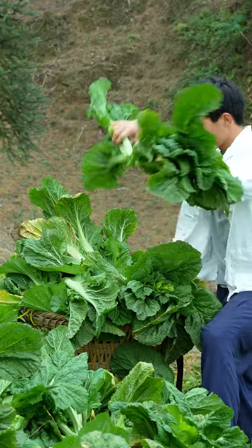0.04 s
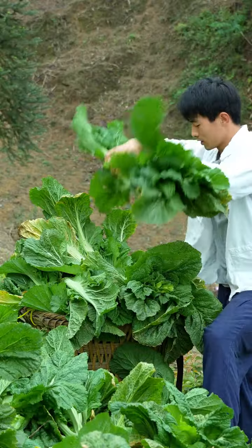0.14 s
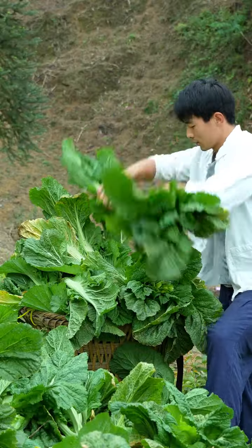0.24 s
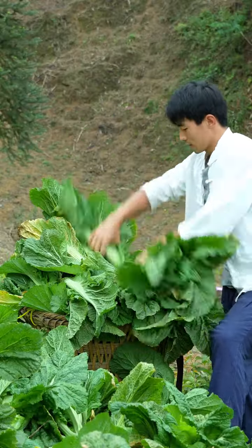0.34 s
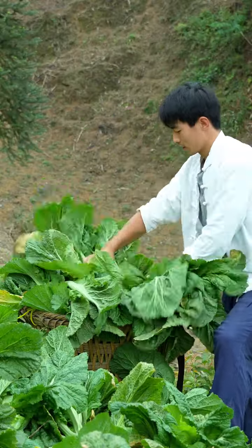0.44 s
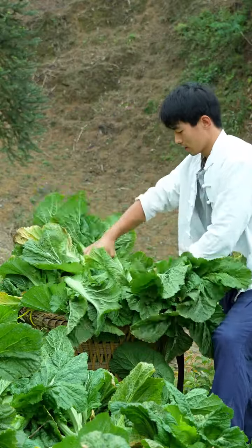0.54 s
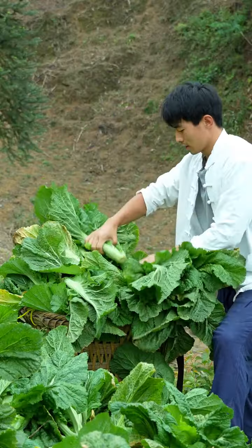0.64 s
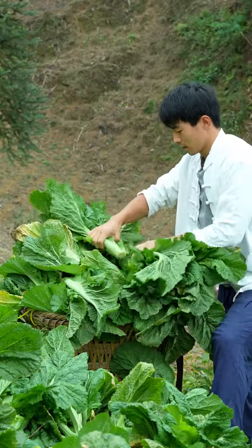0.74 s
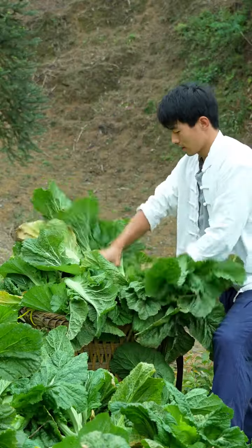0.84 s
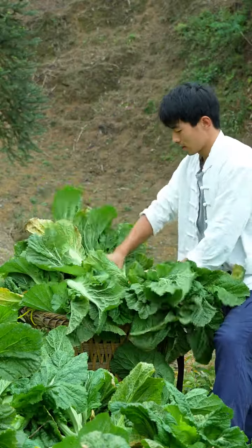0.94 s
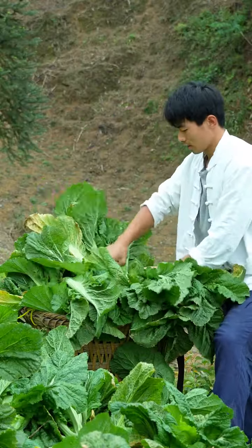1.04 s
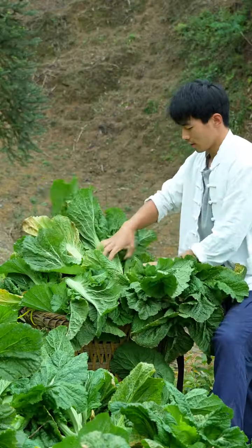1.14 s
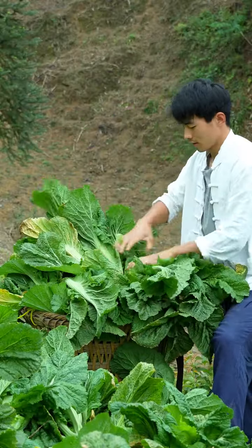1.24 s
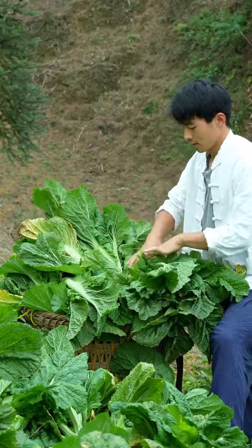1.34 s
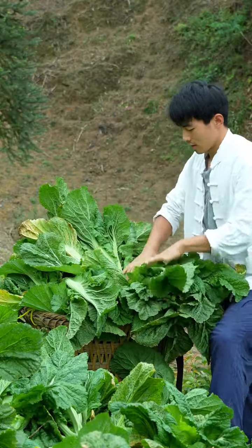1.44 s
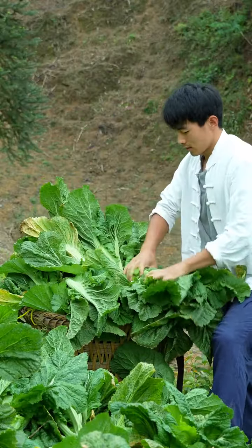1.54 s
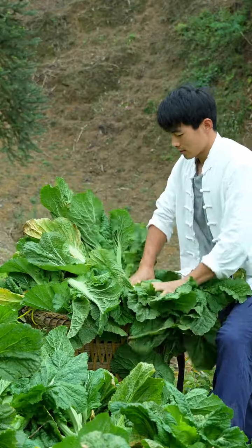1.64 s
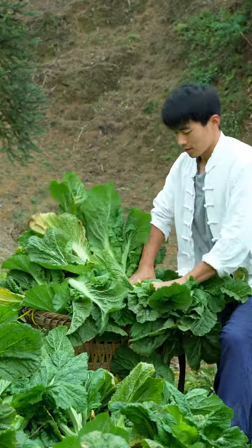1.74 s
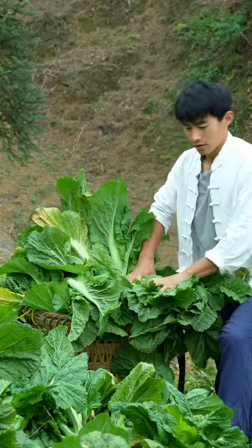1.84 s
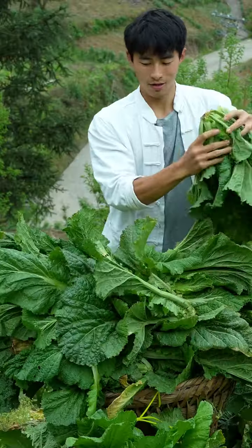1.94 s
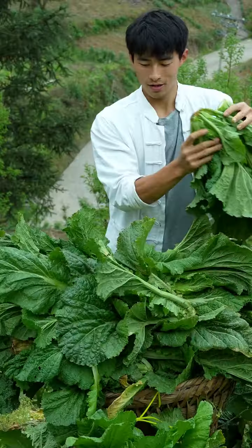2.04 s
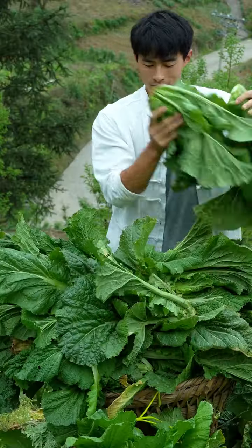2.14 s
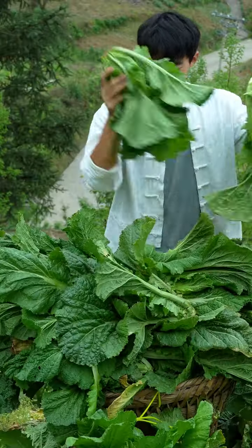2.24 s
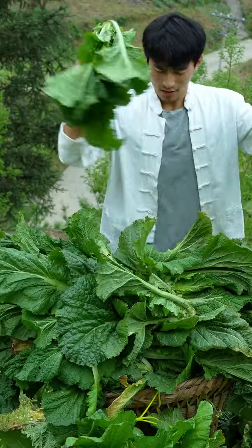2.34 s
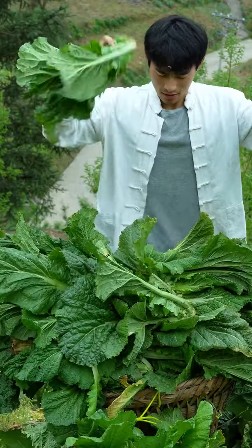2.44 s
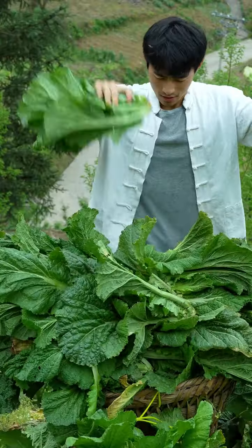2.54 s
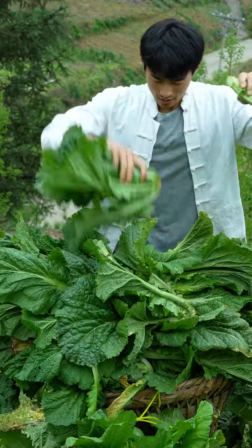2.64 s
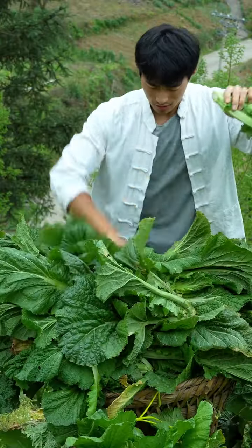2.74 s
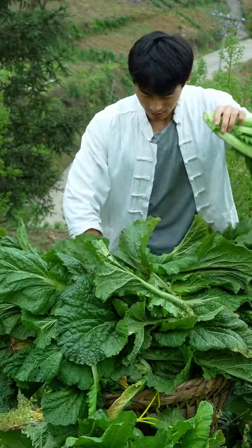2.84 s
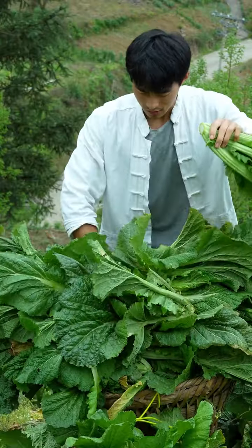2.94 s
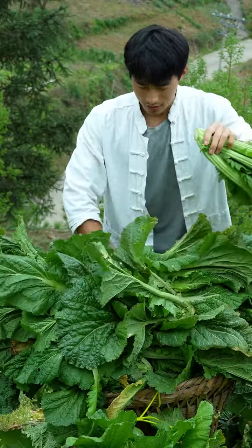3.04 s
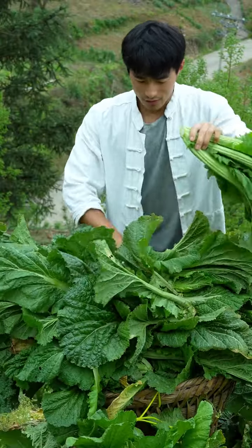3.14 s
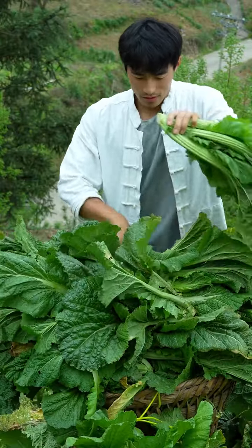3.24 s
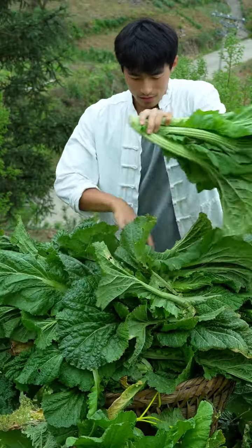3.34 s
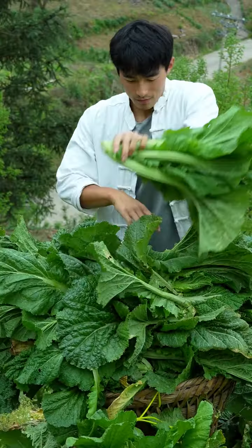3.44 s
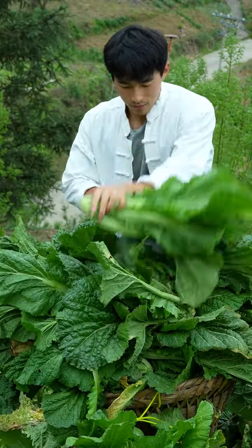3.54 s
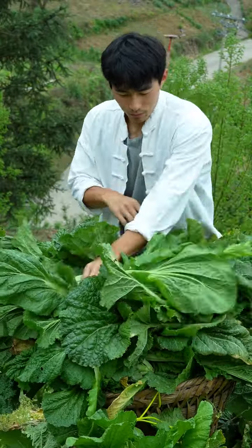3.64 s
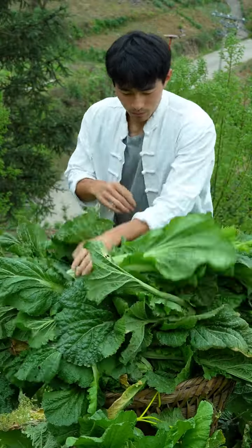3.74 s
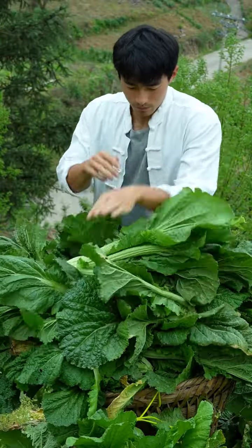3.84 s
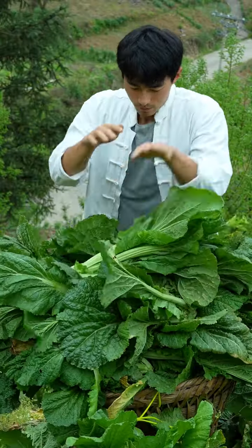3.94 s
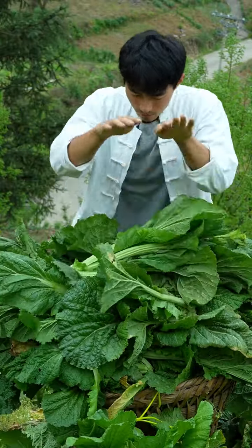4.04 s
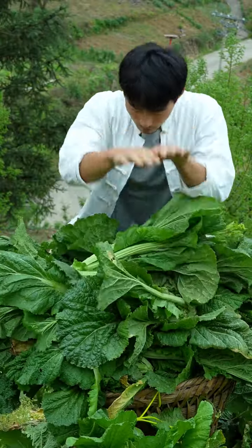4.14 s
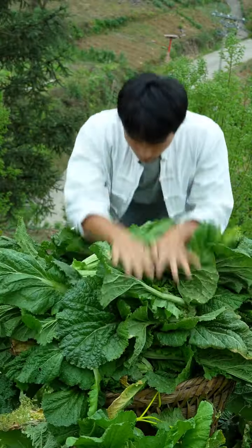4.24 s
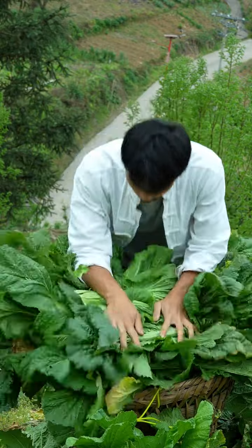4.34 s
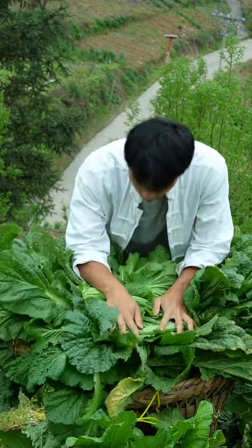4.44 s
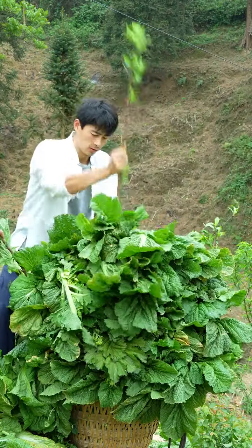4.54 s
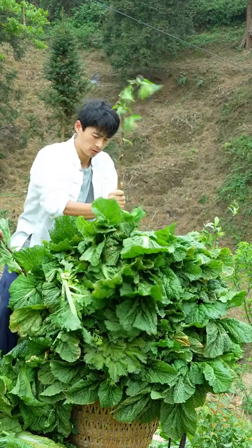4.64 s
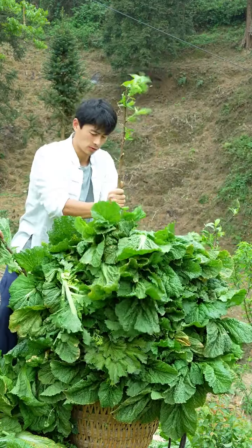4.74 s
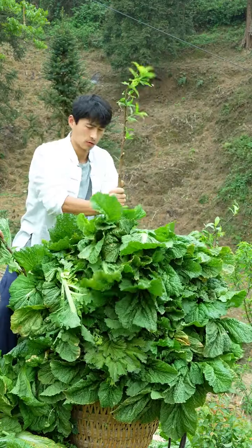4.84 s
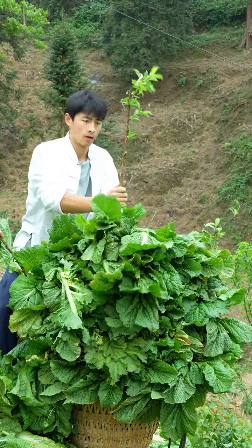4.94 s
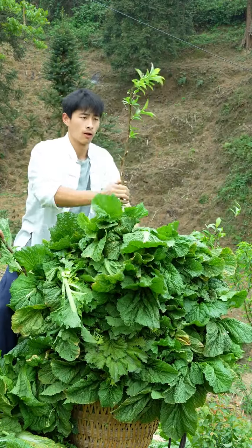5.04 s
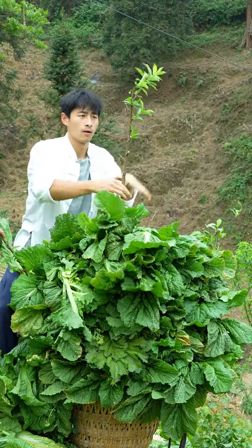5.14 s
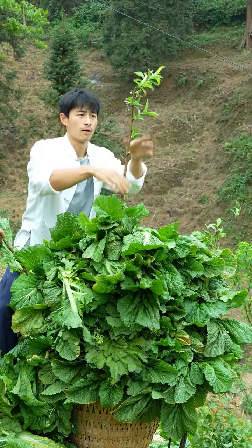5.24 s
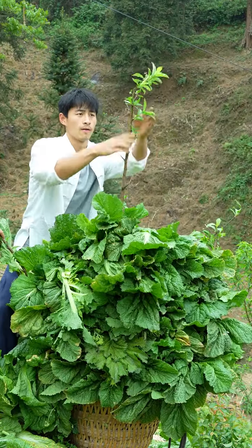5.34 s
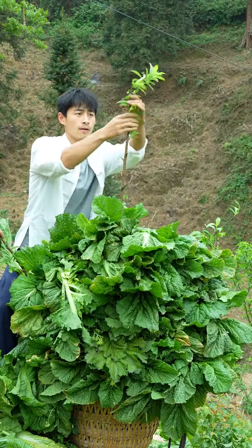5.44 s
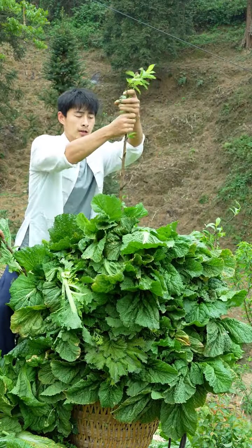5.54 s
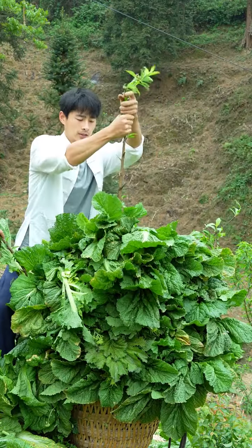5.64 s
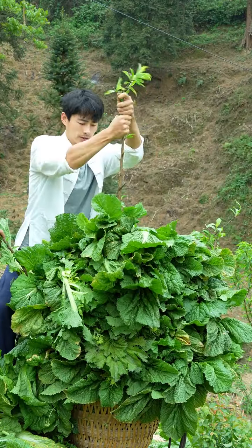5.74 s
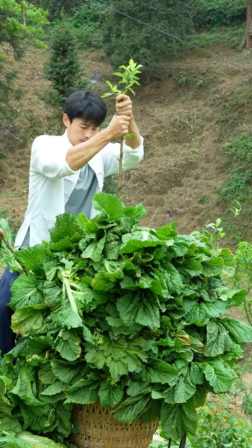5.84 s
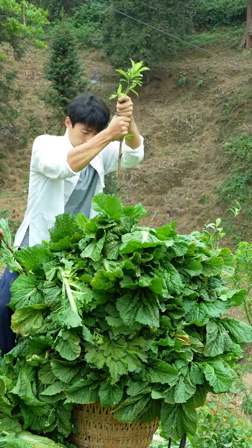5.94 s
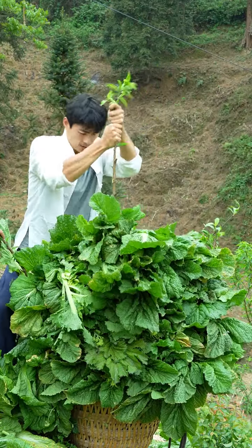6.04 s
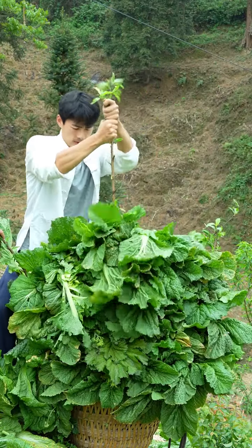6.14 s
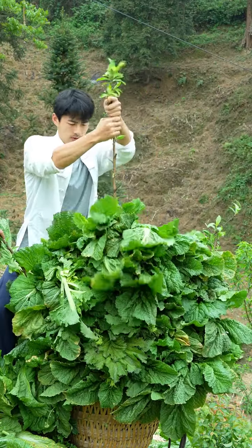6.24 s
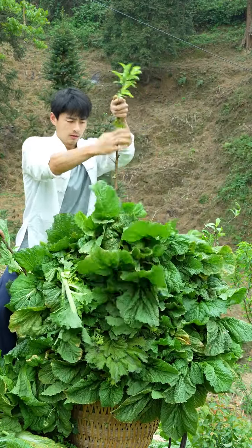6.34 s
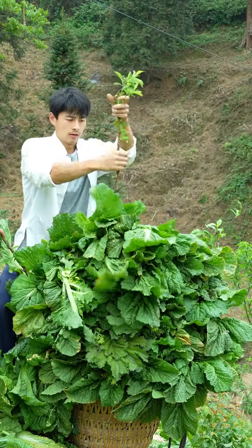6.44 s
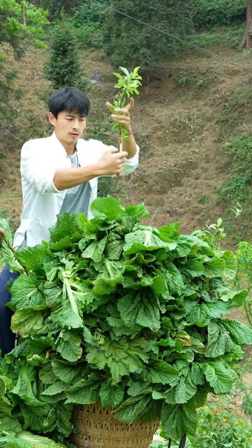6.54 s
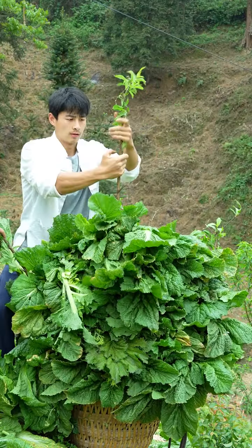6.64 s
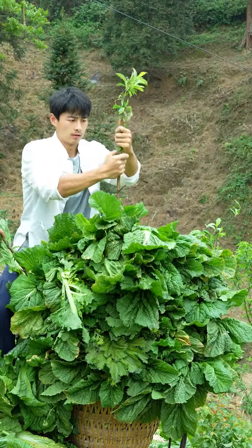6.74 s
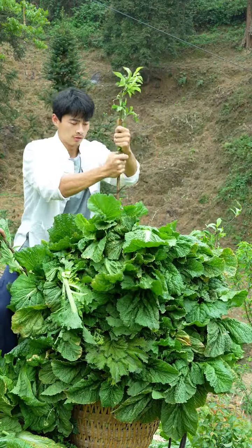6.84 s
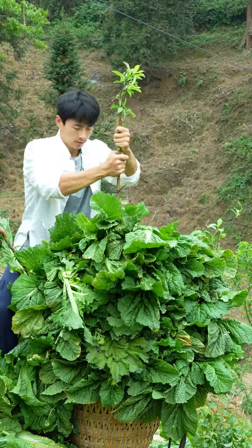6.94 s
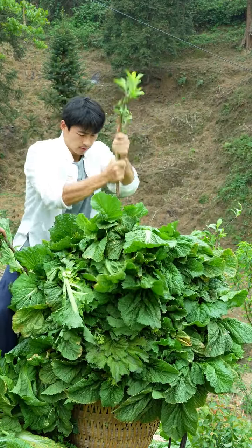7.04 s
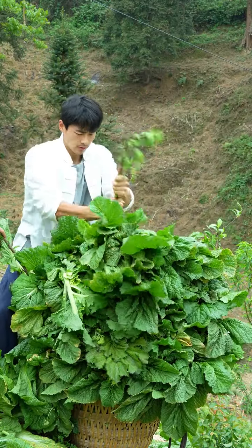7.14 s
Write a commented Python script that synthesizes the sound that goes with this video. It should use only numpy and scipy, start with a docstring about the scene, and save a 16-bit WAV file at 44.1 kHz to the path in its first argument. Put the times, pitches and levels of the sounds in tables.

```python
"""Leafy greens pushed into a basket

Armfuls of leaves are pressed into a woven basket on a hillside, close to a phone microphone.
Filtered noise and random impulses rustle under the hands; stalks snap as noise bursts with damped rings.
Gliding sines whistle from far trees, an insect rasps as clicks through resonances, and the weave groans.
A haze of chirps, coloured noise, a drone and faint early tones form the background."""
import sys
import numpy as np
from scipy import signal
from scipy.io import wavfile
from scipy.ndimage import uniform_filter1d

SR = 44100
rng = np.random.default_rng(int(sys.argv[2]) if len(sys.argv) > 2 else 0)


def materialize(psi):
    """Save the field psi as 16-bit PCM at rate SR to the path in sys.argv[1].

    A 1-D psi becomes a single channel; in a 2-D psi each row is a channel.
    """
    bounded = np.clip(np.atleast_2d(psi).T, -1, 1)
    quanta = np.round(bounded * 32767).astype(np.int16)
    wavfile.write(sys.argv[1], SR, quanta)


N = 316638

# Spectral shape of crushed leaf and stalk tissue: (frequency [Hz], relative density [dB per Hz])
LEAF_SPECTRUM = [(35, -41), (60, -34), (141, -15), (400, -4), (605, 2.5), (1090, 2), (1480, -1), (2770, -2),
                 (5620, -8), (6900, -14.5), (7500, -25.5), (9100, -34.5), (10000, -51), (11000, -81),
                 (16800, -71)]


def leaves():
    """Crackling friction: random creases and sliding contacts excite noise whose colour shifts in patches."""
    sizes = gain_of(2.98 * np.minimum(rng.exponential(1, N), 4)) * rng.choice([-1, 1], N)
    creases = sizes * (rng.random(N) < 1200 / SR)  # 1200 per second on average
    contact_hits = abs(sizes) * (rng.random(N) < 70 / SR)
    contacts = signal.lfilter([1], [1, -np.exp(-1 / (0.007 * SR))], contact_hits)  # sharp start, 7 ms decay
    drive = (0.41 * evened(creases) + 1.08 * rng.standard_normal(N)) * (1 + 0.17 * contacts)
    rib_hz = 780 * gain_of(2.95 * drift(0.016, N))
    ribs = resonate(sizes * (rng.random(N) < 160 / SR), rib_hz, 380)  # dull pops
    spectrogram = signal.stft(evened(drive) + 0.074 * evened(ribs), nperseg=256)[2]
    patches = uniform_filter1d(rng.standard_normal(spectrogram.shape), size=5, axis=0)
    patches = uniform_filter1d(patches, size=9, axis=1)
    patched = signal.istft(spectrogram * gain_of(1.06 * evened(patches)), nperseg=256)[1][:N]
    full = coloured(patched, LEAF_SPECTRUM)
    body = signal.sosfilt(signal.butter(1, 1800, fs=SR, output="sos"), full)
    body_gain, treble_gain = handling()
    return (body_gain * body + treble_gain * (full - body)) / body.std()


def handling():
    """Power addition of pushes: each builds, holds, lets go and leaves the load settling; returns two gains."""
    # Hands pushing leaves down: (crest [s], build [s], hold [s], release [s], pressure level [dB],
    # treble relative to body [dB], settling level traced back to the crest [dB])
    pushes = [(0.374, 0.013, 0.0077, .06, -39.5, -6, -61), (0.414, 0.057, 0.033, .06, -35, 7, -64),
              (0.469, 0.042, 0.014, 0.18, -21, 2, -33.5), (0.71, 0.09, 0.029, 1, -44.5, 8.5, -64),
              (0.954, 0.14, 0.012, 0.089, -33, 6.5, -62), (0.975, 0.023, 0.0096, 0.065, -24, 3.5, -36.5),
              (1.288, 1, 0.061, .15, -48.5, 7, -74), (1.588, 0.046, 0.12, .1, -54.5, 17.5, -66),
              (1.744, 0.19, 0.021, 0.11, -30, 6.5, -42.5), (1.985, 0.21, 0.12, 0.41, -39.5, 11, -62),
              (2.205, 0.1, 0.018, 0.15, -31, -0.5, -41), (2.814, 0.09, 0.015, 0.047, -29, 1.5, -61),
              (2.858, 0.065, 0.019, 0.12, -18, -1.5, -56), (2.876, 0.048, 0.035, 0.049, -24.5, -10, -62),
              (2.93, 0.026, 0.032, .12, -37.5, -5.5, -32), (3.262, 0.57, 0.01, 0.36, -37.5, -2, -55),
              (3.669, 0.093, 0.045, .05, -31.5, 5, -61), (3.717, 0.12, 0.021, 0.12, -23, 1.5, -27),
              (4.338, 0.015, 0.033, 0.051, -28.5, 8.5, -62), (4.375, 0.066, 0.019, 0.1, -14, 0, -60),
              (4.444, 0.014, 0.022, 0.071, -22.5, -7, -46), (4.586, 0.039, 0.0076, 0.2, -21.5, 1, -55),
              (4.649, 0.12, 0.044, 0.071, -22, -8.5, -57), (4.711, 0.036, 0.0094, 0.03, -17.5, -7, -37.5),
              (5.107, 0.55, 0.047, 0.48, -49.5, 4.5, -69), (6.027, 0.012, 0.1, 0.1, -33, -5.5, -28.5),
              (6.242, 0.43, .03, 0.76, -39, 3, -61), (7.138, 0.031, 0.021, .03, -34, 7, -60),
              (7.158, 0.038, .03, .05, -12.5, -23, -58)]
    # Faint stirring between pushes: (time [s], level [dB], treble relative to body [dB])
    stirring = [(0, -50.5, 4.5), (.11, -62.5, 13.5), (1.5, -57.5, 6), (2.7, -49.5, 1), (3.55, -48, -13),
                (4.3, -63, -6), (5.3, -63, 1), (5.55, -55, 4), (5.95, -55, -3), (6.75, -52.5, -1),
                (7.18, -62.5, -13)]
    ramp_db, dull_db_per_s = 31.5, -27.5  # build and release each span this range; held leaves lose treble
    settle_db_per_s, settle_treble_db, settle_rise_s = -44, -0.5, 0.057
    t = np.arange(0, N / SR + .002, .001)
    s, stir_db, stir_treble_db = np.transpose(stirring)
    # gain_of(2 * dB) is a power, so independent noises add correctly
    body = gain_of(2 * np.interp(t, s, stir_db))
    treble = gain_of(2 * np.interp(t, s, stir_db + stir_treble_db))
    for crest, build, hold, release, db, treble_db, settle_db in pushes:
        after = np.maximum(t - crest, 0)
        ramp = np.maximum(crest - t, 0) / build + np.maximum(after - hold, 0) / release
        push = gain_of(2 * (db - ramp_db * np.minimum(ramp, 8)))
        settle_rise = np.minimum(after / settle_rise_s, 1)
        settle = gain_of(2 * (settle_db + settle_db_per_s * after)) * settle_rise
        body = body + push + settle
        bright_push = push * gain_of(2 * dull_db_per_s * after)
        bright_settle = settle * gain_of(2 * settle_treble_db)
        treble = treble + gain_of(2 * treble_db) * (bright_push + bright_settle)
    return [np.interp(np.arange(N) / SR, t, np.sqrt(power)) for power in (body, treble)]


def snaps():
    """Brittle fracture: a juicy stalk gives a sharp crack, brief splintering, a dull knock and a hollow ring."""
    # Breaking stalks: (time [s], level of ring and knock [dB], ring frequency [Hz], peak of the crack [dB])
    stalks = [(0.206, -44, 1170, -36), (0.29, -49, 1250, -27), (0.373, -25, 865, -45),
              (0.399, -27, 1420, -23), (0.47, -20, 1160, -13), (0.4717, -6, 2126, -16),
              (0.4747, -16, 1270, -9), (0.504, -36, 830, -25), (0.527, -22, 990, -12),
              (0.696, -33, 1440, -25), (0.954, -37, 735, -14), (0.9725, -17, 735, -12.5),
              (0.984, -16, 1100, -9), (1.342, -39, 765, -29), (1.674, -22, 1880, -14.5),
              (1.727, -18, 1370, -15), (1.751, -12, 774, -25), (1.807, -24, 1220, -21.5),
              (2.005, -25, 1090, -15.5), (2.0601, -22, 1400, -12.5), (2.1055, -22, 1130, -16),
              (2.1313, -27, 1230, -27), (2.203, -17.5, 1100, -32), (2.739, -49, 1030, -29),
              (2.787, -35, 1010, -19.5), (2.806, -16, 1070, -30), (2.846, -17, 1900, -5.5),
              (2.905, -11, 650, -30), (2.9166, 1, 687, -35), (3.7123, -7.5, 597, -34),
              (3.725, -5, 624, -3.5), (3.7565, -13, 1140, -10), (4.329, -17, 1090, -25),
              (4.4448, 0, 780, -5.5), (4.474, -12, 1100, -6.5), (4.588, -18, 1240, -22),
              (4.614, 1.5, 1100, -12.5), (4.6169, -4, 1640, -26), (4.645, -8.5, 1350, -12),
              (4.702, -12, 1100, -22), (4.7228, -7, 1000, -15), (4.7267, -10.5, 1040, -12.5),
              (4.858, -44, 1410, -27), (5.918, -48, 2020, -22.5), (6.029, -19.5, 1550, -35),
              (6.091, -9.5, 910, -9), (6.104, -16.5, 1700, -17.5), (6.335, -34, 3900, -35),
              (6.7895, -13.5, 934, -23.5), (7.127, -21.5, 1100, -29), (7.15, -12, 747, -11.5)]
    # Overtones of the ring, gone before it: (multiple of the ring frequency, share of amplitude)
    overtones = [(1.5, 0.39), (2.05, 0.4), (2.9, 0.32)]
    out, t = np.zeros(N), np.arange(1800) / SR
    for s, ring_db, hz, crack_db in stalks:
        upper = sum(share * np.sin(2 * np.pi * (ratio * hz * t + rng.random())) for ratio, share in overtones)
        ring = np.sin(2 * np.pi * hz * t) * swell(t, 0.0017) ** 2 + upper * swell(t, 0.0011) ** 2
        high_pass = signal.butter(2, 1.67 * hz, "high", fs=SR, output="sos")
        splinter = signal.sosfilt(high_pass, rng.standard_normal(len(t)))
        crack_envelope = swell(t, 0.00052) + 0.5 * gain_of(-60 * t / 0.068)
        crack = coloured(splinter, LEAF_SPECTRUM) * crack_envelope
        knock = evened(coloured(rng.standard_normal(len(t)), LEAF_SPECTRUM)) * swell(t, 0.0015)
        resonance = gain_of(ring_db) * (0.65 * ring + 0.1 * knock)
        add(out, s, resonance + gain_of(crack_db) * crack / abs(crack).max())
    # A stalk is too small to push bass
    return signal.sosfilt(signal.butter(2, 250, "high", fs=SR, output="sos"), out)


def basket():
    """Stick-slip tone: the weave groans briefly in two harmonic partials as the load settles."""
    # Path of the groan: (time [s], pitch [Hz], level before a common lift of 7.5 dB [dB])
    creak = [(4.496, 390, -61), (4.508, 353, -47.5), (4.6, 359, -58)]
    s, hz, db = np.transpose(creak)
    t, out = np.arange(s[0], s[-1], 1 / SR), np.zeros(N)
    phase = 2 * np.pi * np.cumsum(np.interp(t, s, hz)) / SR
    groan = np.sin(phase) + 1.1 * np.sin(2 * phase)
    add(out, s[0], gain_of(np.interp(t, s, db) + 7.5) * groan * signal.windows.tukey(len(t), .3))
    return out


def birds():
    """Reverberation: distant whistled notes plus a decaying noise tail for their scatter off the trees."""
    # Whistled notes: (start [s], length [s], first pitch [Hz], last pitch [Hz], level at the crest [dB],
    # crest position [share of the length], blur [Hz])
    notes = [(2.067, 0.19, 4475, 4350, -31, 0.35, 220), (2.255, 0.12, 3850, 3325, -31.5, 0.5, 380),
             (2.429, 0.16, 2525, 2410, -45, 0.57, 200), (2.485, 0.14, 3630, 3500, -31.5, 0.17, 150),
             (2.508, 0.084, 3570, 3000, -34.5, 0.3, 260), (2.576, 0.15, 3037, 2916, -40.5, 0.4, 170),
             (2.921, 0.085, 3400, 3480, -33.5, 0.14, 250), (3.099, 0.19, 3656, 3506, -34.5, 0.068, 220),
             (3.147, 0.22, 3530, 2887, -35.5, 0.3, 201), (3.265, 0.12, 4290, 4440, -39, 0.97, 200),
             (3.354, 0.12, 4850, 4320, -36.5, 0.39, 300), (3.396, 0.074, 2740, 2720, -39.5, 0.35, 260),
             (3.537, 0.092, 3687, 3560, -32.5, 0.27, 230), (3.57, 0.13, 3370, 3370, -31, 0.21, 280),
             (3.793, 0.23, 3530, 2850, -34.5, 0.13, 220), (4.033, 0.082, 2200, 2500, -39, 0.46, 154),
             (4.209, .13, 3690, 3220, -32.5, 0.31, 200), (4.485, .09, 3300, 2900, -40, 0.24, 700),
             (4.491, .09, 5400, 5600, -49, .6, 600), (4.788, 0.062, 3187, 3095, -31, 0.32, 200),
             (4.799, 0.27, 5230, 5310, -40, 0.77, 300), (4.87, 0.45, 4810, 4380, -45, 0.074, 350),
             (4.853, 0.052, 2840, 2580, -33, 0.19, 302), (4.87, 0.038, 2910, 3430, -39.5, .4, 400),
             (4.964, 0.1, 2726, 2604, -34, 0.3, 238), (5.011, 0.04, 2980, 3250, -35, 0.54, 350),
             (5.073, 0.056, 2120, 2075, -43, .15, 130), (5.171, 0.17, 4960, 5090, -41, 0.26, 527),
             (5.251, 0.12, 5400, 5360, -44.5, 0.73, 760), (5.342, 0.11, 4860, 5630, -41, 0.33, 352),
             (5.161, 0.13, 2690, 3000, -46, 0.44, 300), (5.274, 0.098, 3120, 2660, -44, 0.3, 400),
             (5.293, 0.066, 4270, 4550, -37, 0.31, 497), (5.412, 0.042, 3400, 3450, -52, 0.14, 150),
             (5.45, 0.08, 1807, 2560, -46, 0.48, 238), (5.51, 0.1, 2600, 2940, -46, 0.62, 262),
             (5.579, 0.14, 2920, 2650, -45, 0.3, 300), (5.737, 0.11, 2565, 2450, -44, 0.085, 350),
             (5.752, 0.21, 3400, 3690, -54, 0.4, 150), (5.84, 0.05, 1850, 2484, -43, 0.54, 200),
             (6.245, 0.16, 4120, 3920, -38.5, 0.54, 550), (6.415, 0.12, 4020, 4670, -42.5, 0.5, 600),
             (6.322, 0.2, 2950, 3046, -43.5, 0.14, 220), (6.445, 0.2, 4970, 5380, -44.5, 0.72, 700),
             (6.518, 0.2, 2110, 2275, -49, 0.28, 350), (6.52, 0.15, 2970, 2770, -50, 0.89, 300),
             (6.633, 0.14, 2763, 3380, -40, .75, 200), (6.677, 0.23, 5650, 5540, -46.5, 0.12, 500),
             (6.794, 0.091, 5250, 5800, -46, .4, 500), (6.871, 0.36, 5580, 5450, -49, 0.41, 500),
             (6.927, 0.16, 4780, 4520, -42.5, 0.57, 200)]
    direct = np.zeros(N)
    for note in notes:
        add(direct, *whistle(*note))
    t = np.arange(SR // 2) / SR
    tail = rng.standard_normal(len(t)) * gain_of(-60 * t / 1.0)  # falls 60 dB per second
    return direct + gain_of(-8.0) * signal.fftconvolve(direct, tail / np.linalg.norm(tail))[:N]


def whistle(start, length, first_hz, last_hz, db, crest, blur):
    """Scattered tone: a gliding, wavering sine is blurred (Hz) by the foliage it crosses."""
    onset_db, fade_db = -4.5, -7  # levels at the two ends, relative to the crest
    glide_bend = 1.7  # above 1, most of the glide comes early
    clear_hz = 180  # blur at which the pure tone is as strong as its scatter
    t = np.arange(0, length, 1 / SR)
    glide = last_hz + (first_hz - last_hz) * (1 - t / length) ** glide_bend
    pitch = glide * (1 + .011 * drift(.005, len(t)))
    clear = np.sin(2 * np.pi * np.cumsum(pitch) / SR)
    fuzzy = resonate(resonate(rng.standard_normal(len(t)), pitch, blur), pitch, blur)
    voice = evened(clear_hz / blur * evened(clear) + evened(fuzzy))
    edges = np.minimum(np.minimum(t / 0.0037, (length - t) / 0.0053), 1)
    swell_db = np.interp(t / length, [0, np.clip(crest, .02, .98), 1], [onset_db, 0, fade_db])
    return start, gain_of(db + swell_db) * voice * edges


def insect():
    """Stridulation: rattling clicks excite body resonances, steady at first, then fading, high ones first."""
    # Rasping strokes: (time [s], relative level [dB])
    strokes = [(2.307, -46), (3.248, -47), (4.179, -53.5)]
    # Body resonances: (frequency [Hz], width [Hz], relative level [dB])
    resonances = [(4900, 130, -5), (5400, 110, -11), (5950, 130, -11), (6950, 550, 0), (8950, 500, -14)]
    out, t = np.zeros(N), np.arange(SR // 2) / SR
    for s, db in strokes:
        clicks = rng.standard_normal(len(t)) * gain_of(1.7 * drift(0.0011, len(t)))
        fade_db = -9 / (1 + np.exp((.12 - t) / .01)) - 30 * t
        body = np.zeros(len(t))
        for hz, width, level_db in resonances:
            ringing = evened(resonate(resonate(clicks, hz, width), hz, width))
            body += gain_of(level_db + fade_db * (hz / 7000) ** 3) * ringing
        envelope = (1 - np.exp(-t / 0.0054)) * (1 - (t / t[-1]) ** 4)
        add(out, s, gain_of(db) * envelope * body)
    return out


def flock():
    """Superposition: so many short chirps of random pitch and slope that they merge into a haze."""
    # Chatter of many farther birds: (time [s], level [dB])
    chatter = [(0, -52), (1.9, -47), (2.3, -53.5), (3.5, -82), (4.6, -36), (5.1, -44), (5.3, -48),
               (5.6, -47), (5.95, -54), (6.3, -49.5), (6.7, -45.5), (7.18, -65)]
    out = np.zeros(N)
    for at, pitch, slope, size in rng.random((1150, 4)):
        hz = 2400 * 2.7 ** pitch
        last_hz = hz * (.92 + .16 * slope)
        blur = 330 * (hz / 3500) ** 1.5  # higher voices scatter more
        add(out, *whistle(at * N / SR, .07, hz, last_hz, 4 * size, .3, blur))
    return gain_of(np.interp(np.arange(N) / SR, *np.transpose(chatter))) * evened(out)


def air():
    """Filtered noise: the soft wash of the hillside, a wavering far drone and a few faint early tones."""
    # Spectral shape of the wash: (frequency [Hz], relative density [dB per Hz])
    wash_spectrum = [(24, 9), (40, 0.5), (80, -7), (150, 0), (344, 1.5), (1130, -6.5), (2090, -4),
                     (3310, -4), (4600, -3.5), (6250, -13.5), (7200, -14), (7700, -51.5), (9100, -55.5),
                     (10000, -65), (16800, -93.5)]
    # Drone: (time [s], level [dB])
    drone = [(0, -65.5), (5.2, -66.5), (5.35, -72), (5.6, -64), (7.18, -59)]
    # Faint early tones: (frequency [Hz], level [dB])
    tones = [(738, -62.5), (1170, -61), (2215, -58.5)]
    drone_hz, drone_width_hz, tone_width_hz, tones_end_s = 246.3, 24, 45, 2.4
    wash_db = -52.5
    out = narrow(drone_hz, drone_width_hz, N) * gain_of(np.interp(np.arange(N) / SR, *np.transpose(drone)))
    for hz, db in tones:
        add(out, 0, gain_of(db) * narrow(hz, tone_width_hz, round(tones_end_s * SR)))
    wash = evened(coloured(rng.standard_normal(N), wash_spectrum))
    return out + gain_of(wash_db + 1.0 * drift(0.74, N)) * wash


def gain_of(db):
    """Logarithmic level: converts decibels to amplitude."""
    return 10 ** (np.asarray(db) / 20)


def evened(x):
    """Power normalisation: scales to rms 1."""
    return x / np.sqrt(np.mean(x ** 2) + 1e-20)


def add(mix, s, sound):
    """Linear superposition: mixes a sound in at s seconds."""
    part = mix[round(s * SR):][:len(sound)]
    part += sound[:len(part)]


def coloured(x, points):
    """Minimum phase: a causal filter has the spectrum points (Hz, dB) and the phase of their Hilbert pair."""
    f, db = np.transpose(points)
    hz = abs(np.fft.fftfreq(8192, 1 / SR))
    filter_db = np.maximum(np.interp(np.log(hz + 1), np.log(f + 1), db), -100)
    log_gain = np.log(gain_of(filter_db))
    taps = np.fft.ifft(np.exp(np.conj(signal.hilbert(log_gain)))).real[:4096]
    return signal.oaconvolve(x, taps)[:len(x)]


def resonate(x, hz, width):
    """Heterodyning: shifts the curve hz to zero, smooths, and shifts back, a resonance of gain 1."""
    turn = np.exp(2j * np.pi * np.cumsum(hz * np.ones(len(x))) / SR)
    r = np.exp(-np.pi * width / SR)
    return 2 * (turn * signal.lfilter([1 - r], [1, -r], x / turn + 1e-18)).real


def drift(seconds, count):
    """Low-passed randomness: noise averaged twice over the given time, with rms 1."""
    span = int(seconds * SR)
    return evened(uniform_filter1d(uniform_filter1d(rng.standard_normal(count), span), span))


def swell(t, crest):
    """Critically damped response: rises to 1 at crest seconds, then dies away."""
    return t / crest * np.exp(1 - t / crest)


def narrow(hz, width, count):
    """Narrow-band noise: two resonances squeeze noise into a wavering tone of rms 1."""
    return evened(resonate(resonate(rng.standard_normal(count), hz, width), hz, width))


def scene():
    """Near-mono mix: a faint, short noise-filtered side signal is added to one channel, taken from the other."""
    # Colour of the side signal, before a common lift of 2 dB: (frequency [Hz], level [dB])
    side_spectrum = [(60, -16.5), (160, -18), (410, -28.5), (1060, -30), (2750, -20), (7170, -24.5)]
    near_share_db = -25.5  # share of the leaves, snaps, groan, birds and insect in the side signal
    near = leaves() + snaps() + basket() + birds() + insect()
    far = flock() + air()
    t = np.arange(2000) / SR
    smear = rng.standard_normal(len(t)) * gain_of(-60 * t / 0.012)
    spread = signal.oaconvolve(far + gain_of(near_share_db) * near, smear / np.linalg.norm(smear))[:N]
    side = gain_of(2.0) * coloured(spread, side_spectrum)
    return np.array([near + far + side, near + far - side])


def record(dry):
    """Band limiting and clipping: a 9.7 kHz low-pass, clipped peaks, a bass cut, then a final band limit."""
    edge_hz, offset = 15700, .0012  # final band limit; steady offset of the converter
    heard = signal.sosfilt(signal.butter(10, 9700, fs=SR, output="sos"), dry)
    clipped = np.clip(heard, -.96, .96)
    cut = signal.sosfilt(signal.butter(2, 90, "high", fs=SR, output="sos"), clipped) + offset
    return signal.oaconvolve(cut, signal.firwin(511, edge_hz, window=("kaiser", 9), fs=SR)[None], "same")


dry = scene()
out = record(dry)
materialize(out)
```